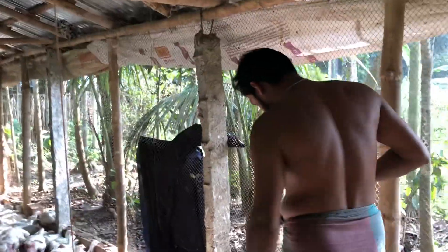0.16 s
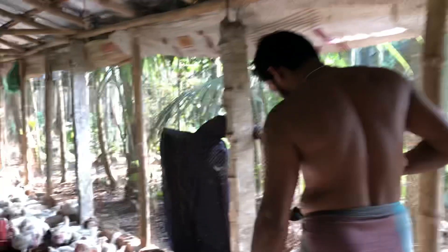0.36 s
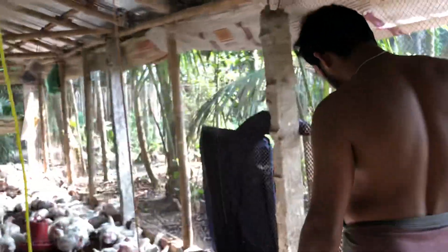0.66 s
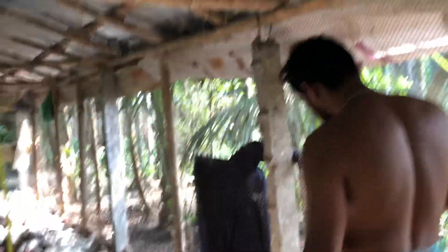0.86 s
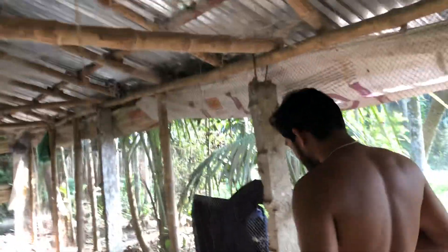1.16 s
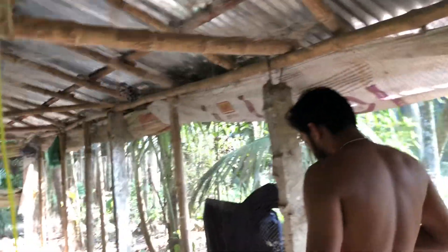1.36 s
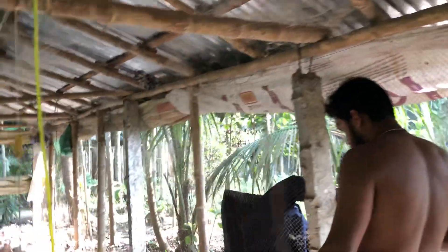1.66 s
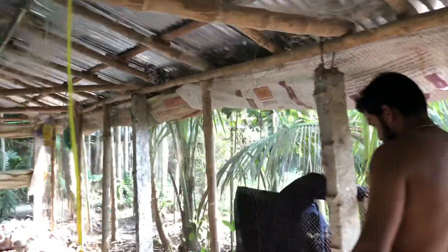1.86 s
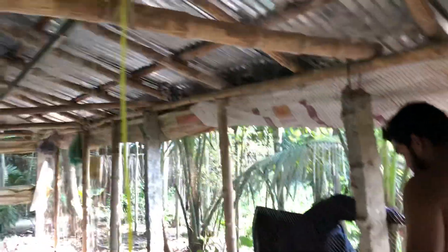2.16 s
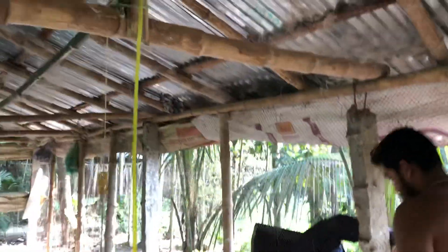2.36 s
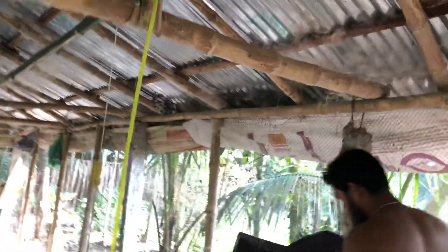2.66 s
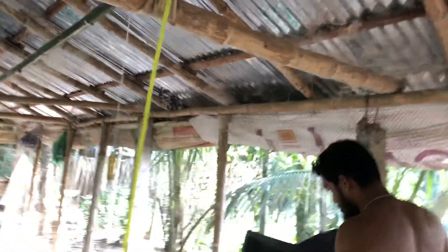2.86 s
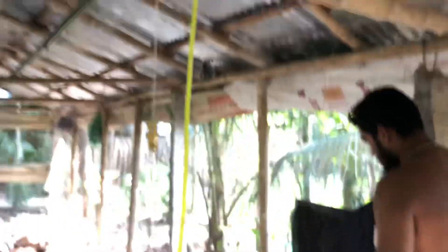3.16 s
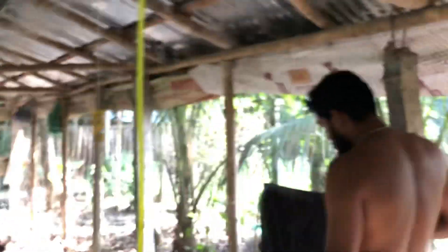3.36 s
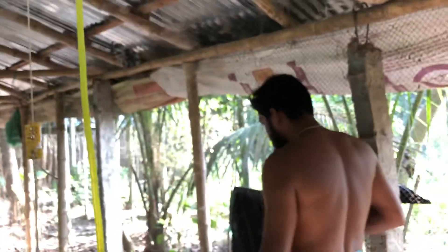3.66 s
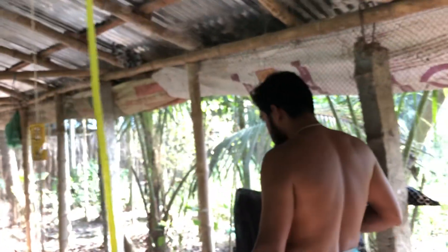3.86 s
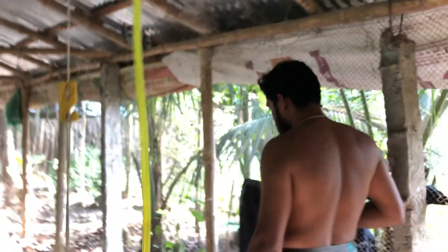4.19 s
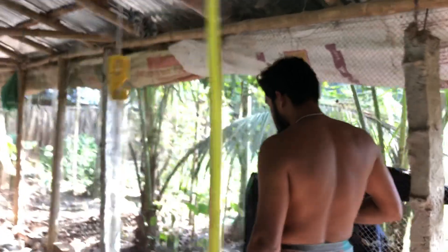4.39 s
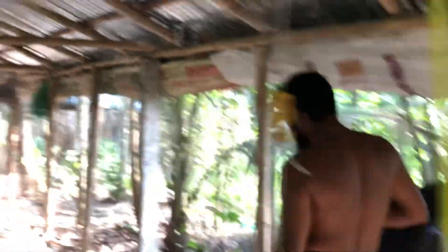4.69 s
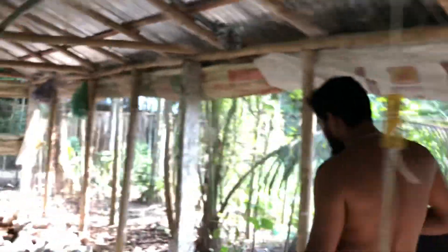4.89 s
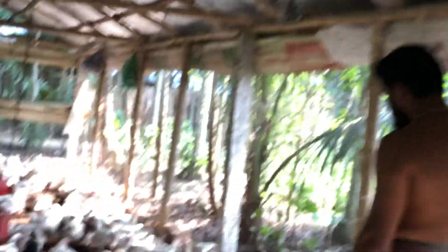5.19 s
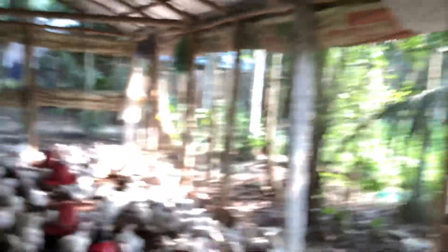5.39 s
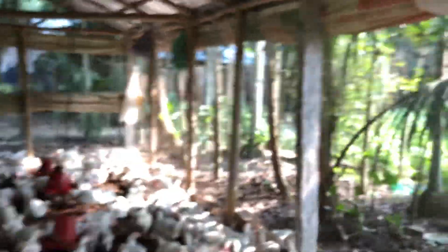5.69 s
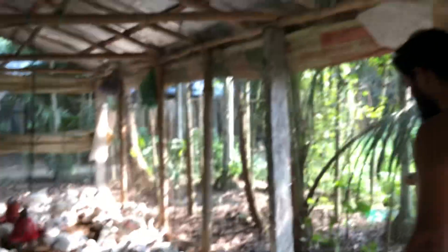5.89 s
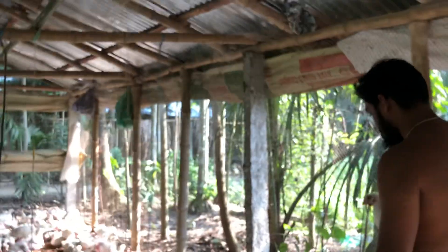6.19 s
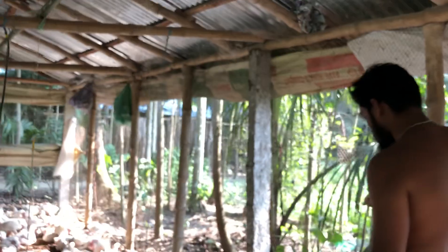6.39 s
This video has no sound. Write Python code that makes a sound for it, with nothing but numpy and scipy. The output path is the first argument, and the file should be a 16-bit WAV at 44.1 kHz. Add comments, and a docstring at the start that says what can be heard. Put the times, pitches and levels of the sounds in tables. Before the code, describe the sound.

A crowded flock of young chickens chirps and clucks, feet scuffling in dry litter; wings flap briskly midway, and one bird squawks at the end.

```python
"""A large flock of young chickens peeps and clucks in an open-sided shed under a tin roof.
Hundreds of sliding whistles a second make the chorus; near birds whistle out of it one by one. Clucks add breath
and pulses through a throat of resonances. Scuffling feet are patchy hiss in the litter, the shed murmur is low
coloured noise, wings slap with hiss, knock and a push of air. Sparse echoes follow; one bird squawks at the end."""
import sys
import numpy as np
from scipy import signal
from scipy.fft import rfft, irfft
from scipy.io import wavfile
from scipy.ndimage import uniform_filter1d

SR = 44100
rng = np.random.default_rng(int(sys.argv[2]) if len(sys.argv) > 2 else 0)


def generate_wav(signal):
    """Clip the signal to [-1, 1] and save it as 16-bit WAV at the path in sys.argv[1]."""
    frames = np.transpose(np.atleast_2d(signal))
    scaled = np.clip(frames, -1, 1) * 32767
    pcm = np.round(scaled).astype(np.int16)
    wavfile.write(sys.argv[1], SR, pcm)


N = 288414


def amp(db):
    """Turns decibels into a linear gain."""
    return 10 ** (np.asarray(db) / 20)


def evened(x):
    """Scales a sound to rms 1."""
    return x / np.sqrt(np.mean(x ** 2) + 1e-20)


def level(curve):
    """Gain over the whole scene, through points of seconds and dB."""
    return amp(np.interp(np.arange(N) / SR, *np.transpose(curve)))


def add(mix, s, sound):
    """Mixes a sound in from second s, cut off at the end of the mix."""
    part = mix[max(round(s * SR), 0):][:len(sound)]
    part += sound[:len(part)]


def coloured(x, points):
    """Filters a sound with dB points joined along a logarithmic pitch axis."""
    f, db = np.transpose(points)
    hz = np.fft.rfftfreq(len(x), 1 / SR)
    gain = amp(np.interp(np.log(hz + 1), np.log(f + 1), db))
    return irfft(rfft(x) * gain, len(x))


def resonate(x, hz, width):
    """A fixed resonance of gain 1, its width in Hz."""
    return signal.lfilter(*signal.iirpeak(hz, hz / width, SR), x)


def glide(x, hz, width):
    """A resonance that follows the curve hz: shift it down to 0 Hz, smooth, shift back."""
    turn = np.exp(2j * np.pi * np.cumsum(hz) / SR)
    r = np.exp(-np.pi * width / SR)
    return 2 * (turn * signal.lfilter([1 - r], [1, -r], x / turn)).real


def wobble(count, smooth_s):
    """Slow random drift of rms 1: noise smoothed twice."""
    size = max(int(smooth_s * SR), 2)
    return evened(uniform_filter1d(uniform_filter1d(rng.standard_normal(count), size), size))


def whistle(hz, overtones_db, hoarse_db):
    """An unsteady near-sine along the pitch curve, with three flickering overtones; a hoarse voice breaks up."""
    unsteady_hz = hz * (1 + 0.015 * wobble(len(hz), 0.0027))
    turn = 2 * np.pi * (np.cumsum(unsteady_hz) / SR + rng.random())
    overtones = np.sin(2 * turn) + amp(-2) * np.sin(3 * turn)
    overtones += amp(-9.5) * np.sin(4 * turn) * (hz < SR / 9)  # left out where it could alias
    tone = np.sin(turn) + amp(overtones_db + 2.9 * wobble(len(hz), 0.0012)) * overtones
    swell = np.hanning(len(hz)) ** 0.39
    return tone * swell * amp(hoarse_db * wobble(len(hz), 0.0031))


def chorus(count=2100):
    """Some three hundred peeps a second: each slides down and flattens out near the lowest pitch of the voice."""
    # The chorus swells and ebbs. Each row: time in seconds, level in dB before the mix.
    flock = [(0, -36), (.13, -30.5), (.37, -32.5), (.56, -29), (.69, -37), (.78, -32), (1, -34),
             (1.21, -30), (1.3, -36.5), (1.43, -34), (2.13, -30.5), (2.6, -34), (2.71, -29.5), (2.85, -35),
             (2.91, -27), (3.03, -33), (3.13, -26), (3.21, -31.5), (3.6, -28.5), (3.82, -28.5), (3.93, -36),
             (3.98, -29.5), (4.97, -31), (5.46, -31), (5.55, -26), (5.62, -30), (6.54, -32)]
    # How strongly a peep carries at each pitch. Each row: pitch in Hz, relative gain in dB.
    carry = [(800, -4), (950, 4), (1120, 0.5), (1400, -1), (1900, 2.5), (2800, -4.5), (3600, -10.5),
             (5000, -2), (9000, -10.5), (16000, -38)]
    lowest_start_hz, start_range = 1147.5, 3.2  # range: ratio of highest to lowest start of the slide
    floor_hz, bend_hz = 1002.4, 150  # where the slide flattens, and how softly it bends there
    nearest_db = 8.5  # nearest against farthest birds
    out = np.zeros(N)
    for k, (when, high, steep, long, near, bright) in enumerate(rng.random((count, 6))):
        length = .014 + .052 * long ** 1.8
        t = np.arange(int(length * SR)) / SR
        fall_hz_per_s = 2000 + 34000 * steep ** 1.301
        slide_hz = lowest_start_hz * start_range ** high - fall_hz_per_s * t
        hz = bend_hz * np.logaddexp(slide_hz / bend_hz, (floor_hz + 180 * bright) / bend_hz)
        overtones_db = -28 + 23 * bright ** 0.99 * (1 - steep)  # steep slides are purer
        peep = amp(nearest_db * near ** 2.0) * whistle(hz, overtones_db, hoarse_db=3.0)
        add(out, (k + when) / count * N / SR, peep)
    surges = amp(1.13 * wobble(N, 0.037))  # quick and unplanned
    return level(flock) * surges * evened(coloured(out, carry))


def murmur():
    """Far clucking and moving air blur into a low uneven wash."""
    # Colour of the shed murmur. Each row: frequency in Hz, relative level in dB per Hz.
    air = [(20, -45), (75, -25), (444, -7), (682, -13.5), (852, -6.5), (1080, -3.5), (1200, -2),
           (1560, -36), (2640, -100)]
    wash = evened(coloured(rng.standard_normal(N), air))
    return amp(-44.5 + 3.7 * wobble(N, 0.027)) * wash


def scuffle():
    """Feet and feathers in dry litter: patchy hiss in short scrapes, with crackle; stirred air rumbles below."""
    # Colour of the litter. Each row: frequency in Hz, relative level in dB per Hz.
    litter_colour = [(1470, -14.5), (2500, -2), (2900, -3.5), (4340, -15), (12400, -29.5), (15200, -38)]
    # Scuffling and fluttering come and go. Each row: time in seconds, level in dB.
    stir = [(0, -36), (.2, -39.5), (1.1, -41.5), (1.5, -37), (2.6, -38), (3.5, -37), (4.5, -37.5),
            (4.95, -35), (5.3, -35.5), (6.05, -39), (6.4, -35), (6.54, -43)]
    # Rumble of the stirred air. Each row: time in seconds, level in dB.
    rumble = [(0, -72), (2.7, -78), (3.2, -55), (4.8, -63), (6.54, -71)]
    scrapes = amp(2.05 * wobble(N, 0.049) + 0.94 * wobble(N, 0.012))
    click_sizes = amp(2.9 * np.minimum(rng.exponential(1, N), 5.))
    crackle = click_sizes * (rng.random(N) < 500 / SR) * rng.choice([-1, 1], N)  # some 500 clicks a second
    hiss = scrapes * (rng.standard_normal(N) + amp(-12.5) * evened(crackle))

    # Patches of the hiss rise and fall across pitch and time.
    z = signal.stft(hiss, nperseg=256)[2]
    patches = uniform_filter1d(rng.standard_normal(z.shape), size=7, axis=0)
    patches = evened(uniform_filter1d(patches, size=14, axis=1))
    patchy = signal.istft(z * amp(2.77 * patches), nperseg=256)[1][:N]
    litter = evened(coloured(patchy, litter_colour))

    gusts = amp(1.2 * wobble(N, 0.035)) * rng.standard_normal(N)
    stirred = evened(resonate(resonate(gusts, 82, 200), 84, 200))
    return level(stir) * litter + level(rumble) * stirred


def voice(hz, db, rough, bright_db, beak):
    """Pulses and puffs of breath through the throat of a bigger bird; a wider beak lifts its lower resonances."""
    # Resonances of the throat. Each row: centre in Hz at beak opening 1, width in Hz,
    # level in dB before brightness.
    throat = [(473, 100, -4), (700, 680, -15.5), (1464, 570, -1), (2600, 920, -9.5), (4600, 950, -7),
              (7700, 2900, -17), (11500, 3800, -22.5)]
    turns = np.cumsum(hz * (1 + 0.029 * wobble(len(hz), 0.00185))) / SR
    folds = sum(np.cos(2 * np.pi * k * turns) / (1 + (k / 9) ** 2) for k in range(1, 20))
    puffs = (0.35 + np.exp(-(turns % 1) / 0.51)) * rng.standard_normal(len(hz))  # one puff a pulse
    drive = (1 - rough) * evened(folds) + rough * evened(puffs)
    drive = signal.sosfilt(signal.butter(2, 330, "high", fs=SR, output="sos"), drive)
    drive = drive * amp(1.9 * wobble(len(hz), 0.0048))
    sound = np.zeros(len(hz))
    for k, (f, width, g_db) in enumerate(throat):
        centre_hz = f * beak ** (f < 3500)  # the beak moves only the lower resonances
        gain = amp(g_db + bright_db * max(np.log2(f / 2500), 0))  # brightness per octave above 2500 Hz
        ring = glide(glide(drive, centre_hz, width), centre_hz, width)
        sound += (-1) ** k * gain * ring
    return amp(db) * evened(sound) * signal.windows.tukey(len(hz), 200 / len(hz))


def clucks():
    """Short low clucks, some placed and some scattered: a falling hum with a rough voice over it."""
    # Low clucks. Each row: time in seconds (each begins 8 ms ahead of it), level in dB before the split
    # into hum and voice, middle pitch in Hz, length in seconds.
    placed = [(0.009, -33, 387, 0.026), (0.123, -35, 388, 0.033), (0.317, -37, 392, 0.033),
              (1.023, -40, 540, 0.045), (1.953, -38, 490, 0.026), (4.435, -38.5, 371, 0.022),
              (4.877, -33.5, 361, 0.042), (5.511, -31.5, 413.3, 0.038), (6.214, -32, 404, 0.057)]
    # The same columns, each drawn as width of the range and lowest value.
    scattered = rng.random((90, 4)) * [N / SR, 9, 200, .012] + [0, -47.5, 365.5, 0.0026]
    out = np.zeros(N)
    for s, db, hz, length in [*placed, *scattered]:
        pitch = hz * np.linspace(1.04, .96, int(max(length, .005) * SR))
        # The beak is nearly shut: mostly fundamental.
        hum = np.sqrt(2) * amp(db - 4.0) * whistle(pitch, -13.0, hoarse_db=4.5)
        breath = voice(pitch, db - 1.0, rough=0.65, bright_db=-15.5, beak=np.ones(len(pitch)))
        add(out, s - .008, hum + breath)
    return out


def near_peeps():
    """The birds that stand out one by one, each a whistle sliding straight from first to last pitch."""
    # Near birds. Each row: start in seconds, length in seconds, first pitch in Hz, last pitch in Hz,
    # level in dB, overtones in dB against the fundamental.
    peeps = [(0.034, 0.018, 1694, 1540, -22.5, -26), (0.057, 0.098, 3570, 2000, -28.5, -39),
             (0.077, 0.046, 1296, 1013, -28, -20), (0.12, 0.033, 1856, 945, -25, -34),
             (0.308, 0.024, 1780, 1255, -27, -30), (0.452, 0.028, 1602, 1030, -27.5, -30),
             (0.526, 0.024, 1897, 1226, -25.5, -27), (0.703, 0.012, 1720, 1380, -28.5, -30),
             (0.736, 0.064, 3190, 1510, -27, -40), (0.799, 0.05, 1124, 1030, -27.5, -30),
             (0.775, 0.026, 1390, 1363, -26.5, -16), (0.845, 0.073, 2840, 2565, -45, -6),
             (1.196, 0.013, 1650, 1400, -24, -16), (1.207, 0.027, 1275, 1162, -26.5, -17),
             (1.424, 0.014, 1580, 1350, -25.5, -30), (1.492, 0.064, 3260, 2060, -29.5, -33),
             (1.591, 0.029, 1737, 1730, -25.5, -17), (1.616, 0.022, 1750, 1130, -31, -30),
             (1.772, 0.039, 1336, 1023, -22.5, -37.0), (1.824, 0.05, 2400, 1714, -30.5, -22),
             (1.848, 0.025, 1660, 1690, -23.5, -26), (2.01, 0.023, 1374, 1410, -23, -40),
             (2.056, 0.05, 3050, 1850, -29.5, -32), (2.442, 0.043, 1817, 1760, -26.5, -28),
             (2.553, 0.027, 1544, 1790, -23, -41), (2.792, 0.018, 2100, 1100, -26.5, -30),
             (2.884, 0.018, 1036, 996, -25, -30), (3.007, 0.018, 1690, 1600, -24.5, -32),
             (3.581, 0.027, 2004, 1124, -24.5, -26), (3.594, 0.046, 1562, 1086, -28, -16),
             (3.679, 0.023, 1906, 1750, -18.5, -35), (3.709, 0.034, 2720, 2120, -26, -25),
             (3.796, 0.024, 1926, 1600, -22.5, -23), (3.967, 0.026, 1964, 1766, -23.5, -22),
             (4.154, 0.031, 1468, 1294, -28, -5), (4.233, 0.025, 1870, 1160, -25, -27),
             (4.469, 0.0405, 2040, 1680, -27.5, -33), (4.702, 0.019, 1750, 1720, -22, -28),
             (4.802, 0.016, 4230, 3800, -29.5, -23), (4.883, 0.018, 3580, 3460, -27.5, -22),
             (4.939, 0.026, 2710, 2660, -20, -26), (4.956, 0.017, 2430, 2470, -20.5, -22),
             (4.978, 0.024, 3050, 2920, -24, -14), (4.996, 0.03, 4900, 4500, -34, -30),
             (5.03, 0.038, 4000, 2845, -34.5, -19), (5.043, 0.06, 2200, 1220, -28.5, -22),
             (5.136, 0.012, 1870, 1920, -17.5, -40), (5.207, 0.037, 3165, 2860, -31, -12),
             (5.465, 0.073, 3040, 2960, -33.5, -11), (5.55, 0.0296, 2970, 2340, -26, -30),
             (6.227, 0.055, 3170, 3190, -31, -20), (6.257, 0.031, 2740, 2590, -37.5, -4),
             (6.358, 0.031, 2196, 2130, -25.5, -19)]
    out = np.zeros(N)
    for s, length, first_hz, last_hz, db, overtones_db in peeps:
        pitch = np.linspace(first_hz, last_hz, int(length * SR))
        add(out, s, amp(db) * whistle(pitch, overtones_db, hoarse_db=3.0))
    return out


def wings():
    """Each beat: a feather hiss that dies, led by a snap if crisp; a hollow knock, then a low push of air."""
    # Wing beats. Each row: start in seconds, feather hiss in dB before a 5.5 dB cut,
    # knock and push of air in dB (the push 5 dB lower), crispness 0-1.
    slaps = [(0.4697, -35.5, -62, 0.7), (1.1895, -32, -63, 0), (2.696, -31.5, -63, 0.1),
             (2.771, -33, -60, 0.2), (2.828, -36, -61, 0.4), (2.9103, -30, -41, 0.1),
             (3.1373, -31, -39, 0.3), (3.1829, -39, -31.5, 0.6), (3.2387, -19, -32, 0.54),
             (3.342, -17, -32, 0.65), (3.4464, -19.5, -30, 0.5), (3.4907, -21, -26, 0.27),
             (3.5443, -19, -30, 0.55), (3.648, -27, -34.5, 0), (4.032, -25, -41, 0.42),
             (4.094, -28, -40, 0.44), (4.147, -30, -41, 0.4), (4.174, -29, -42, 0.2),
             (4.213, -28.5, -42, 0.3), (4.818, -27, -43, 0.4), (4.897, -24.5, -42, 0),
             (5.5154, -27, -36.5, 0.24)]
    out, t = np.zeros(N), np.arange(4000) / SR
    feathers = signal.butter(1, [4000, 12500], "band", fs=SR)
    for s, hiss_db, push_db, crisp in slaps:
        attack = 1 - np.exp(-t / (0.00023 + 0.0032 * (1 - crisp)))
        swish = attack * amp(-60 * t / (.15 - 0.17 * crisp))  # crisp beats start and die faster
        snap_noise = rng.standard_normal(len(t)) + amp(8) * (t == 0)  # opens with a click
        snap = crisp * amp(11 - 60 * t / 0.0072) * snap_noise
        hiss = signal.lfilter(*feathers, snap + swish * rng.standard_normal(len(t)))
        knock = np.sin(2 * np.pi * 505 * t) * amp(-60 * t / 0.056) * (1 - np.exp(-t / 0.00033))
        push_hz = 55 + 380 * np.exp(-t / 0.0111)  # the gust slows as it spreads
        push_swell = np.exp(-((t - .012) / 0.0095) ** 2)
        push = np.sin(2 * np.pi * (np.cumsum(push_hz) / SR + rng.random())) * push_swell
        add(out, s, amp(hiss_db - 5.5) * hiss + amp(push_db) * (knock + amp(-5) * push))
    return out


def shed(x):
    """Sparse echoes of random sign from roof, floor and posts; the open sides let them die fast."""
    at = np.arange(150, 16000, 20)  # one echo in every 20 samples
    taps = np.zeros(16020)
    fade = amp(-60 * at / SR / 0.37)  # 60 dB in 0.37 s
    taps[at + rng.integers(0, 20, len(at))] = rng.choice([-1., 1.], len(at)) * fade
    return signal.oaconvolve(x, taps / np.linalg.norm(taps))[:N]


def squawk():
    """One squawk: a breathy rasp whose voice breaks into a higher, clearer note."""
    # Course of the squawk. Each row: time in seconds, level in dB, pitch in Hz,
    # brightness in dB per octave, beak opening as a factor on the lower resonances.
    course = [(6.338, -31, 484, -3, 1.2), (6.342, -21.5, 502, -12, 1.17), (6.369, -32.5, 526, -1, 1.5),
              (6.396, -30.5, 544.6, -6, 1.32), (6.426, -29, 557, -4, 1.5), (6.429, -23.5, 701, -1, 1.04),
              (6.447, -24, 686.5, -0.5, 0.95), (6.462, -27, 709, 2, 1.16), (6.476, -24, 705, 2.5, 1.05),
              (6.488, -21, 700, -3.5, 0.87), (6.501, -27.5, 684, -6, 0.94), (6.52, -42, 690, -8, 0.77)]
    out = np.zeros(N)
    s, *columns = np.transpose(course)
    times = np.arange(s[0], s[-1], 1 / SR)
    db, hz, bright_db, beak = (np.interp(times, s, c) for c in columns)
    break_hz, rasp, note = 630, 0.63, 0.3  # roughness 0-1 below and above the break of the voice
    rough = note + (rasp - note) / (1 + np.exp((hz - break_hz) / 30))
    add(out, s[0], voice(hz, db, rough, bright_db, beak))
    return out


def scene():
    """Sums the birds, wings, litter and murmur with the shed's echoes of birds and wings."""
    voices = near_peeps() + clucks() + squawk()
    far, beats = chorus(), wings()
    echoes = shed(amp(-11.0) * voices + amp(-10.0) * far + amp(-12.5) * beats)
    return (voices + beats + amp(-1.5) * far + echoes + scuffle() + murmur())[None]


def record(dry):
    """The microphone drops the deepest bass; then a steep filter limits the treble."""
    thinned = signal.sosfilt(signal.butter(3, 50, "high", fs=SR, output="sos"), dry)
    edge_hz = 16100
    band_limit = signal.firwin(511, edge_hz, window=("kaiser", 9), fs=SR)
    return signal.oaconvolve(thinned, band_limit[None], "same")


dry = scene()
out = record(dry)
generate_wav(out)
```